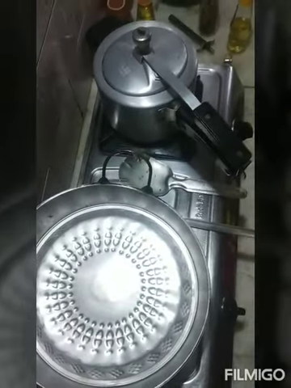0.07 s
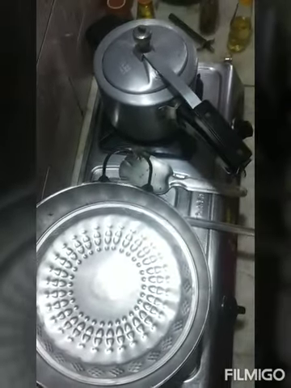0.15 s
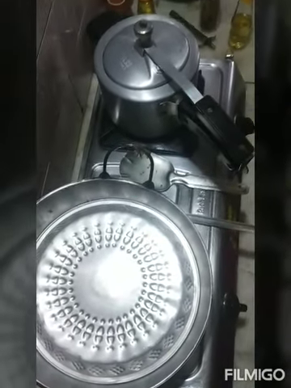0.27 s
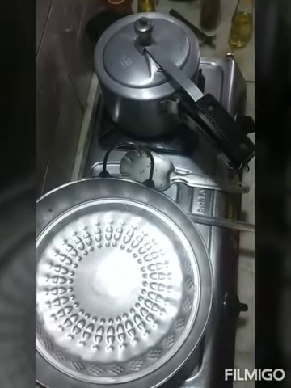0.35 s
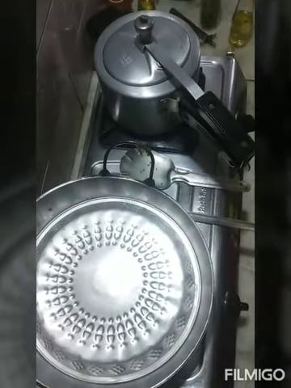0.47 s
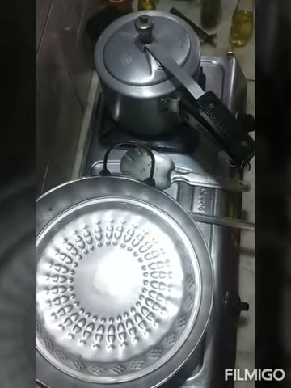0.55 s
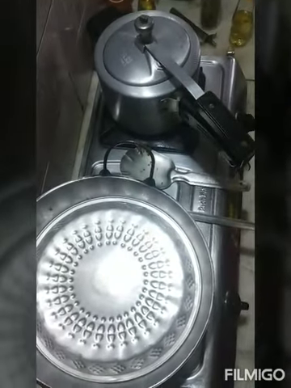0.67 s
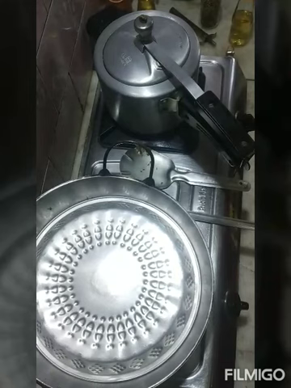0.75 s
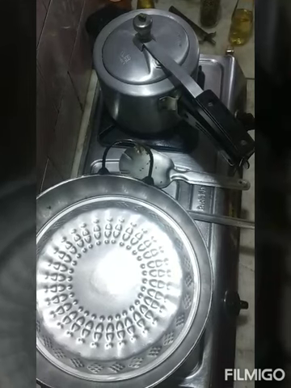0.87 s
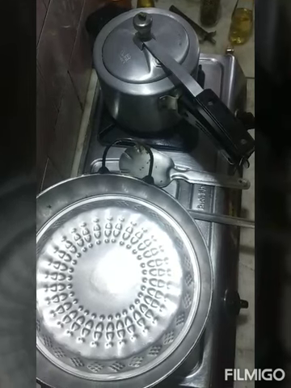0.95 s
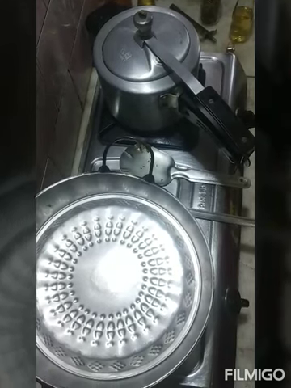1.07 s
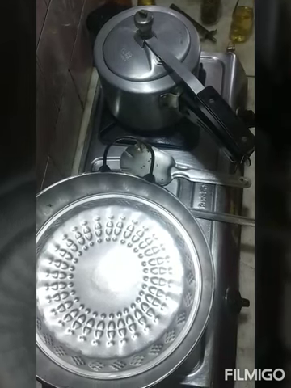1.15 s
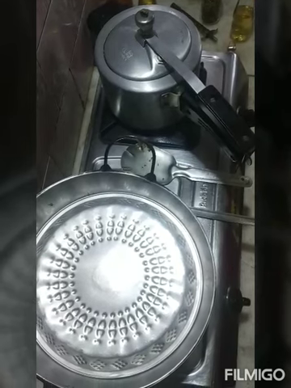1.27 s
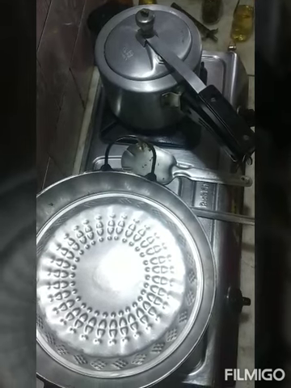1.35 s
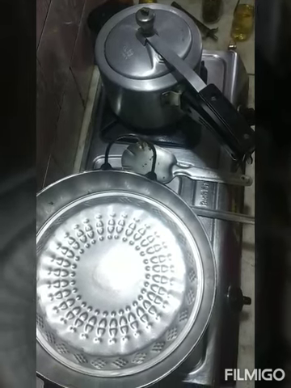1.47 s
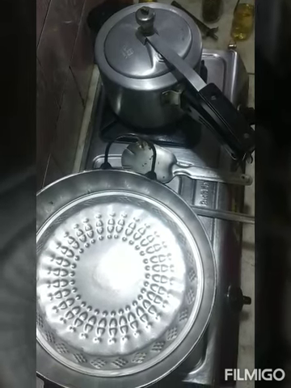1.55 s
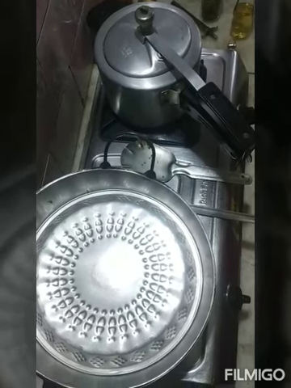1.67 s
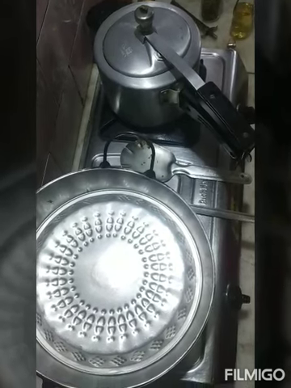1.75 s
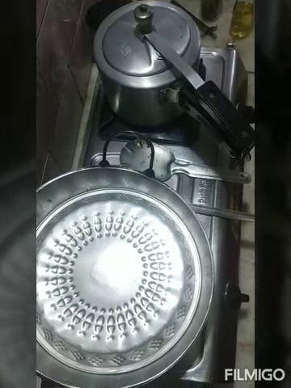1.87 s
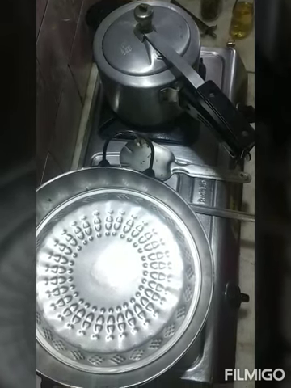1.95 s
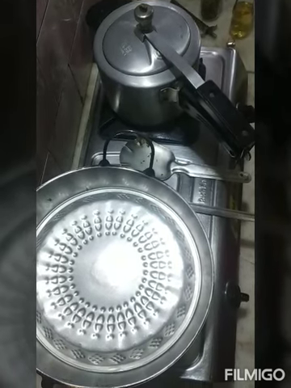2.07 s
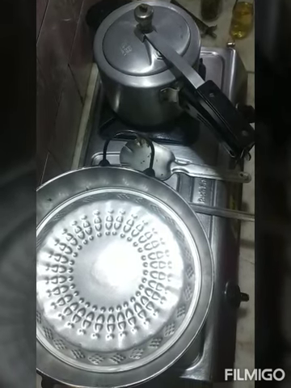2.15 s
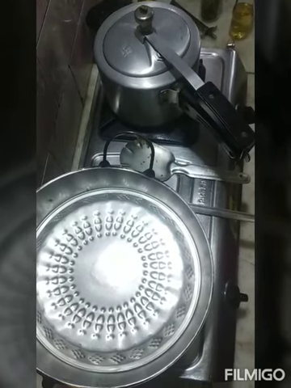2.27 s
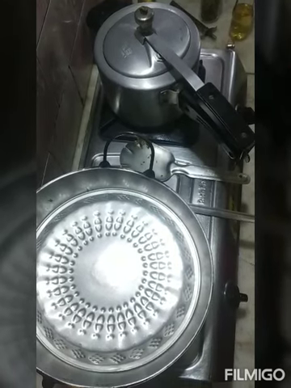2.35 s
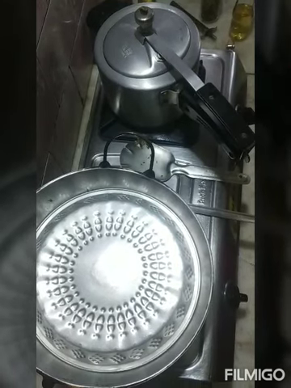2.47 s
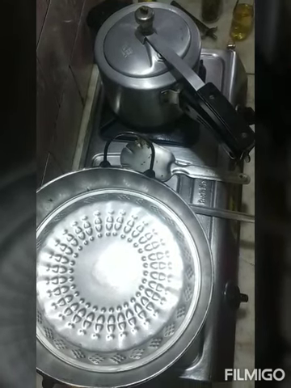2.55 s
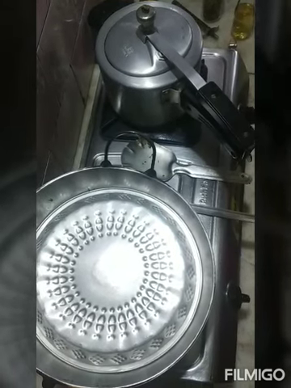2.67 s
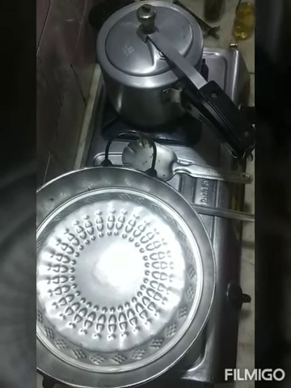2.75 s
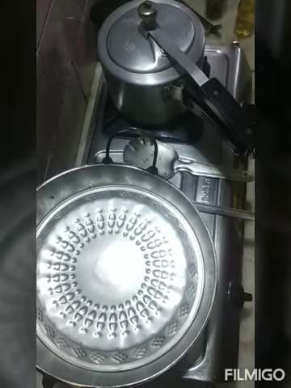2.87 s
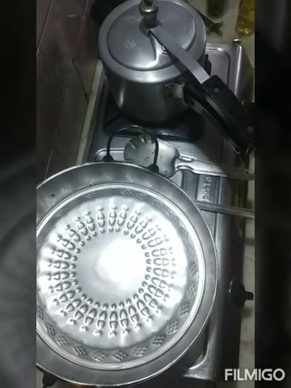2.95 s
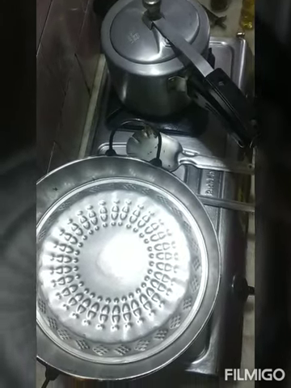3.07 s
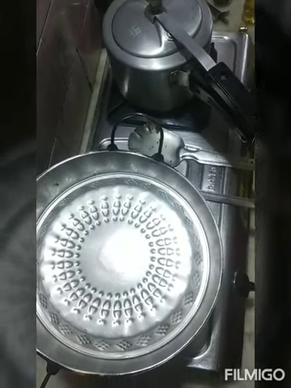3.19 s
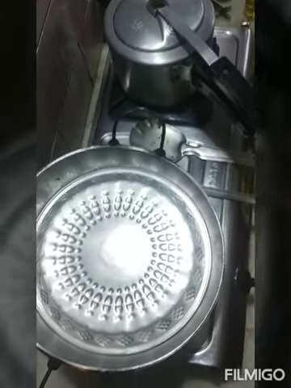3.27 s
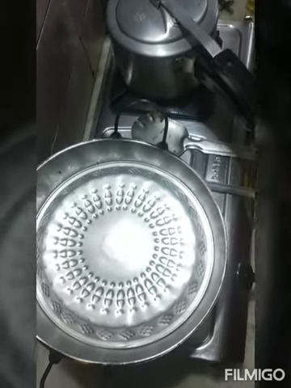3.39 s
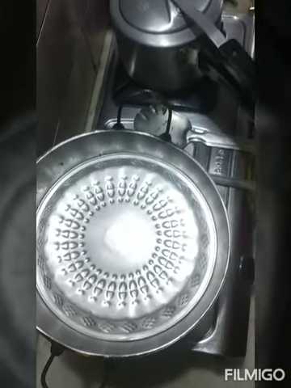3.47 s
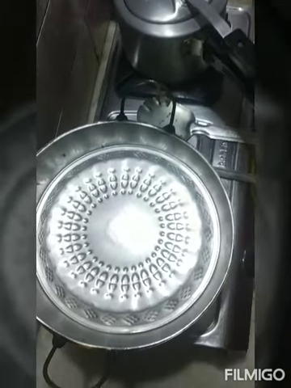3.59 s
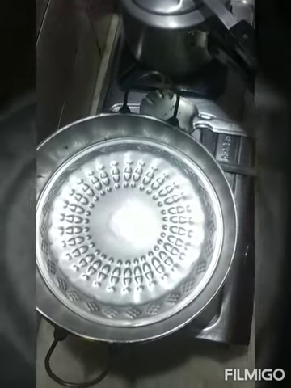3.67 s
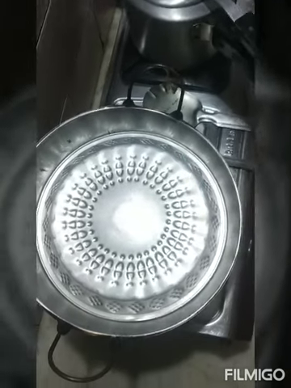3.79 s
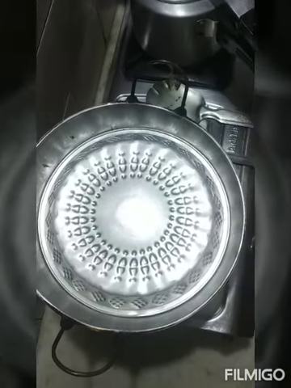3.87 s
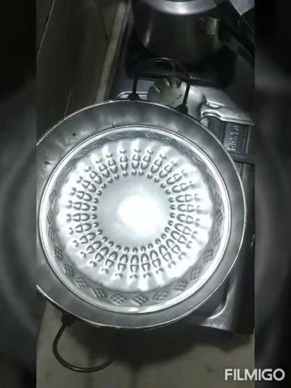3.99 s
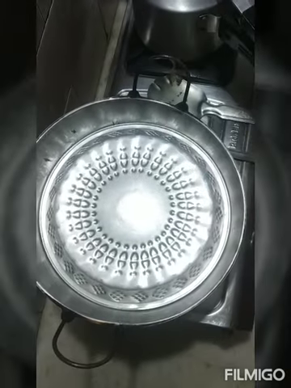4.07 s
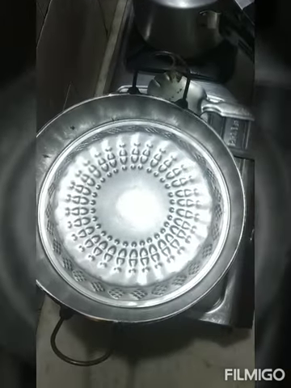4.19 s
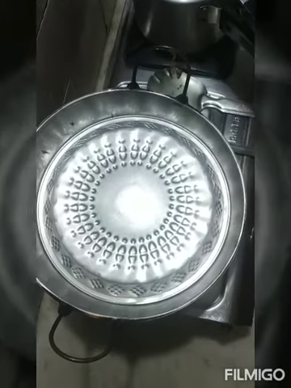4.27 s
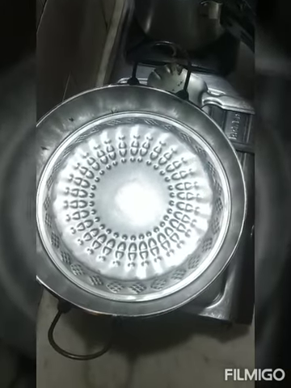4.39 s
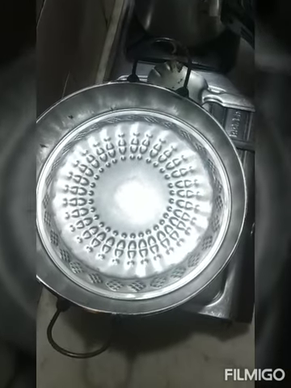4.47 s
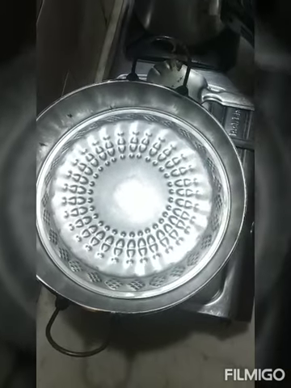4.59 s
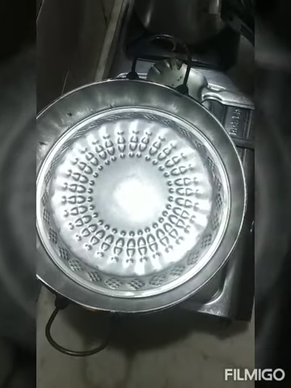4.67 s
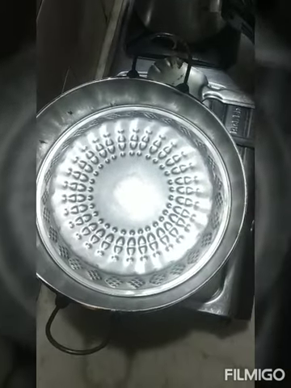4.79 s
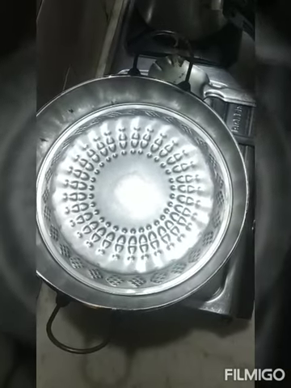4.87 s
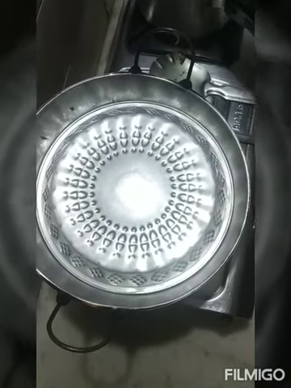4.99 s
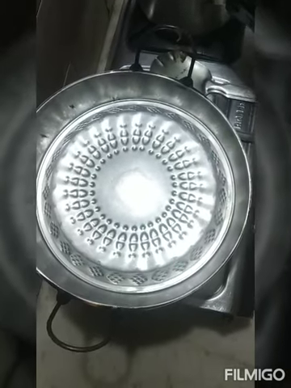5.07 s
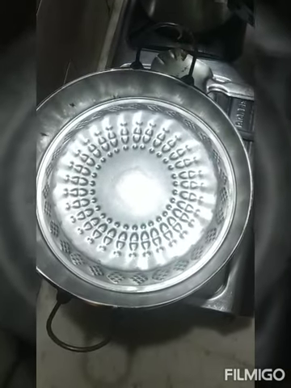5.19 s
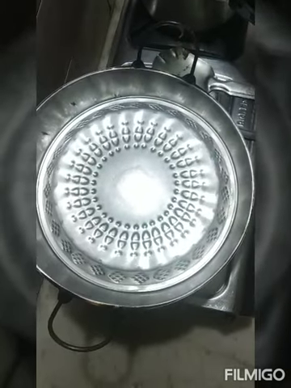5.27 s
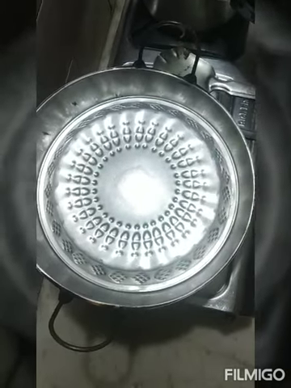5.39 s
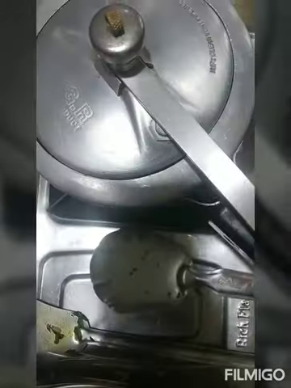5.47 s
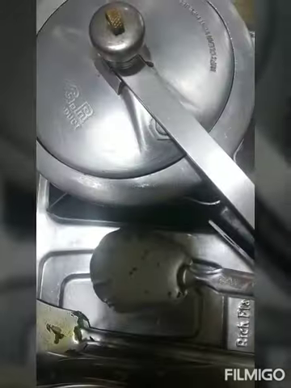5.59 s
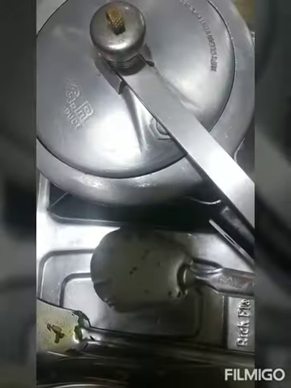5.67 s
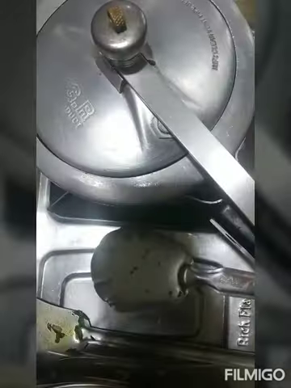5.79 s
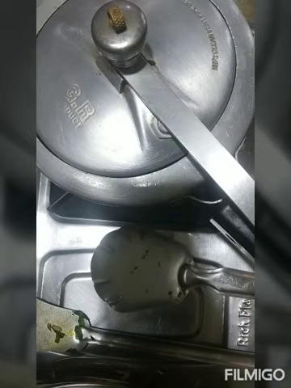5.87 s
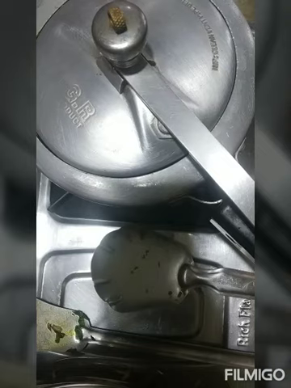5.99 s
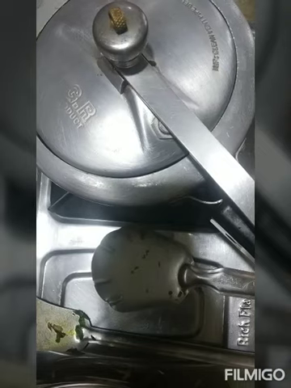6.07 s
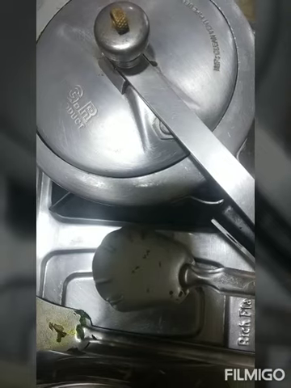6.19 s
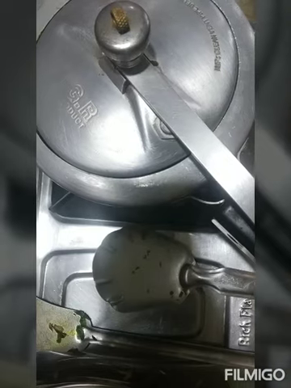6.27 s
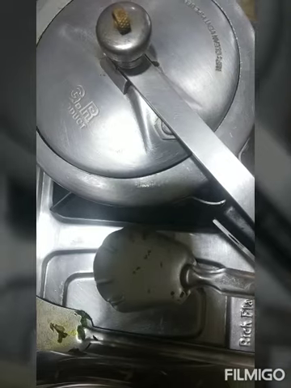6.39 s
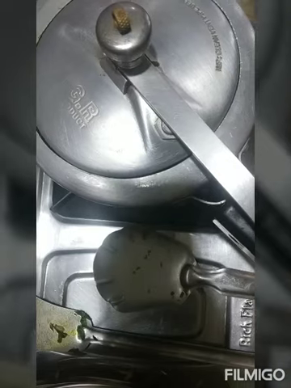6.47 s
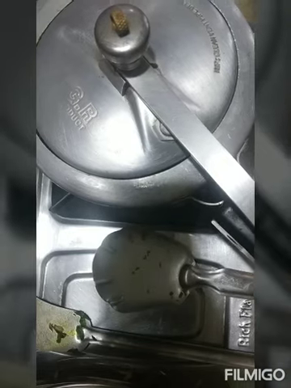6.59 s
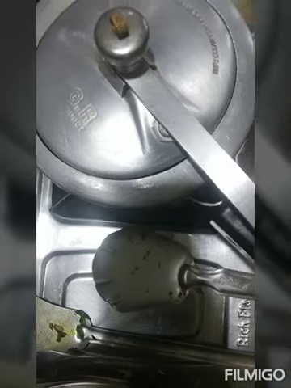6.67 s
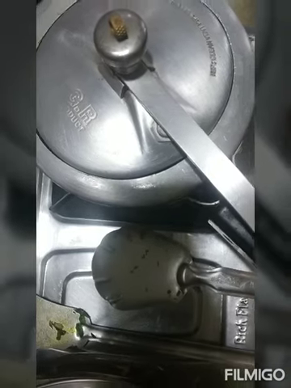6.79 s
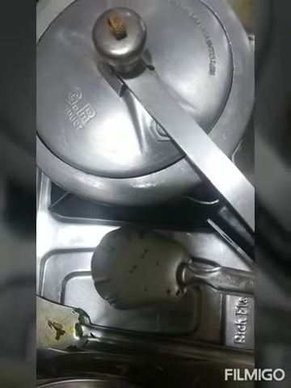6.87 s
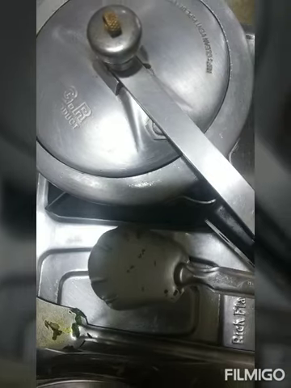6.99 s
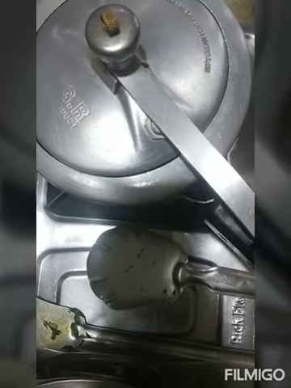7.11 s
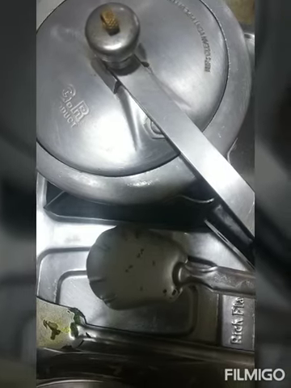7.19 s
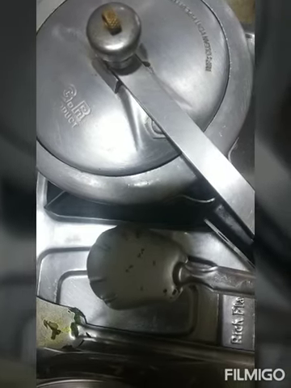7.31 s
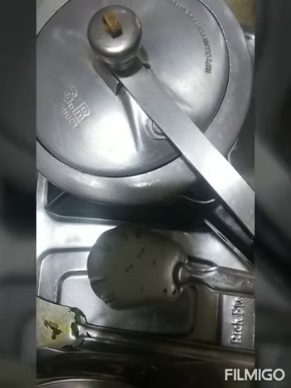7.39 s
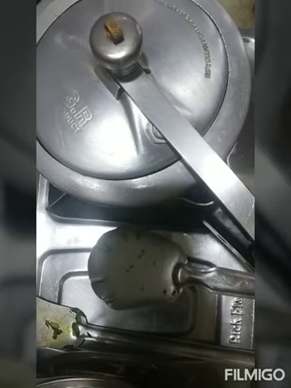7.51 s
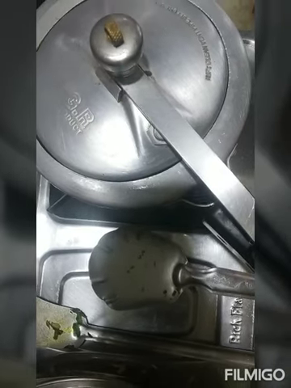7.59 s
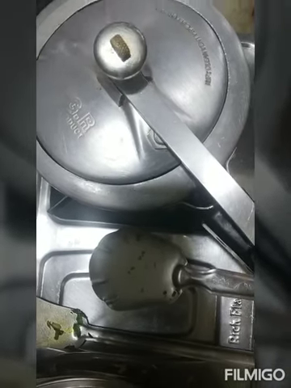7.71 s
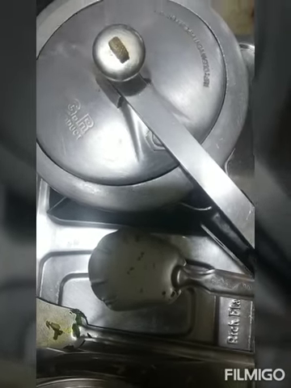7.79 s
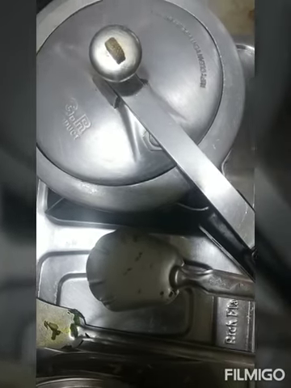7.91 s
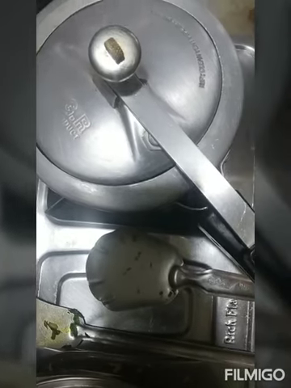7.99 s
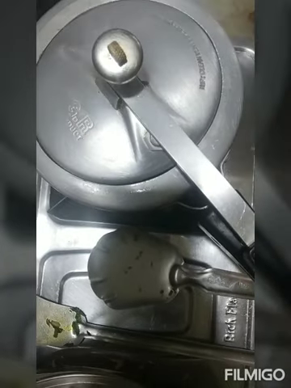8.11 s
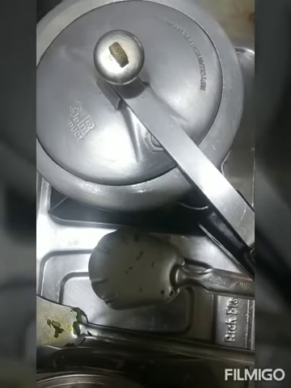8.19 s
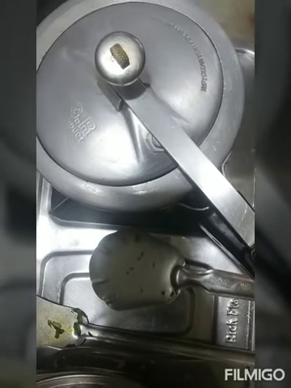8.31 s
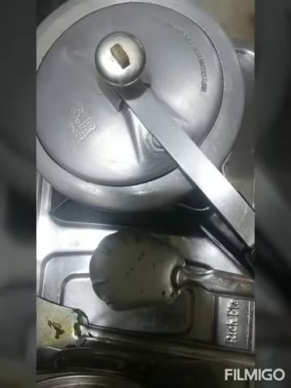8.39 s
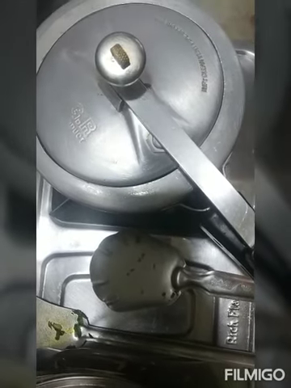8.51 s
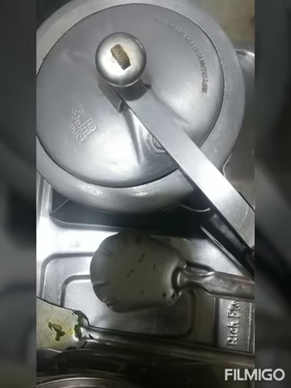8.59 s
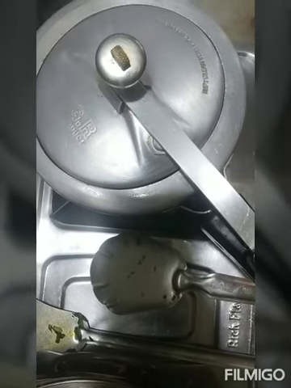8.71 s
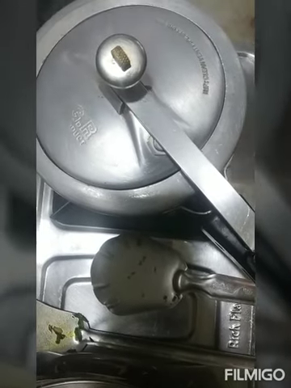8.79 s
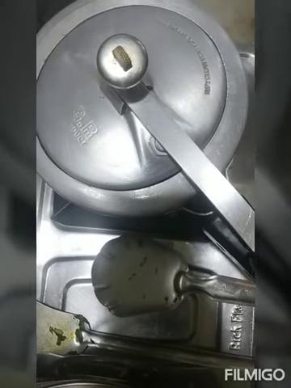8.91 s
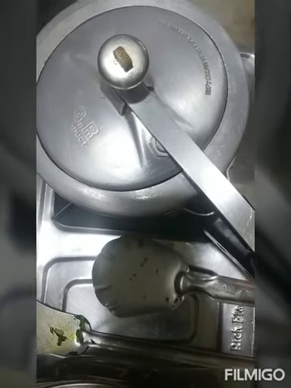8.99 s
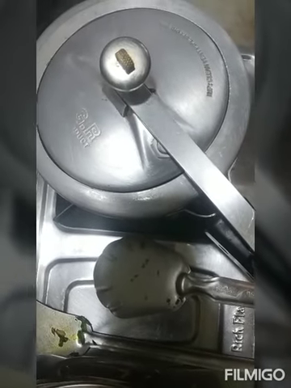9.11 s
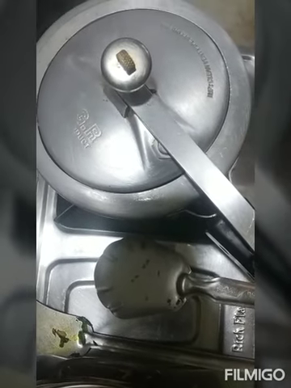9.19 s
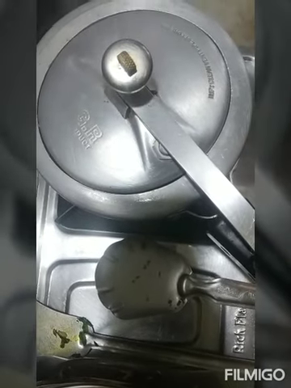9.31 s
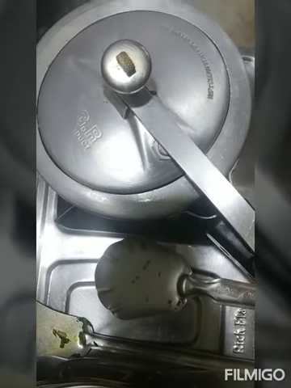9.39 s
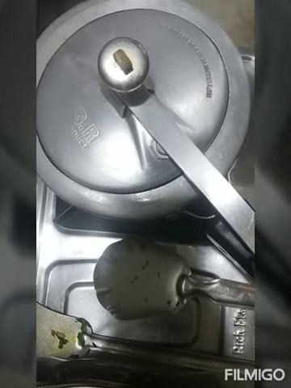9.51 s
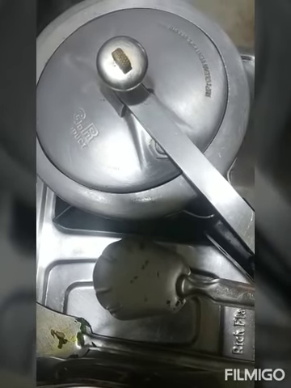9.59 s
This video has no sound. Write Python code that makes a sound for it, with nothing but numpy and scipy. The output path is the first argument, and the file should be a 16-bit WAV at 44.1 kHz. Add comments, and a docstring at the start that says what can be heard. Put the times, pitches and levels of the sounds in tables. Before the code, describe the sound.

From the start, a pressure cooker leaks a thin, high, slightly wavering hiss, with the soft rumble and drone of a gas burner beneath it, in a small hard-walled kitchen. A faint, high metal ping comes at about 1.5 seconds and another near 4.2. The leak spits briefly a few times between 4.5 and 6 seconds. A small tick and soft thud at 5.3 are followed by a steel cup clinking at 5.5 and settling more faintly at 6. At 6.7 seconds the valve weight tips and a much louder jet of steam bursts out, spurting and faltering as it grows. From 7.8 seconds the valve lifts fully, and by about 8.1 the steam is a very loud, harsh, steady blast. Gusts buffet the close stereo microphones with a low rumble, and the sound overloads and distorts until the end, at around 9.5 seconds.

```python
"""A pressure cooker on a gas stove in a hard-walled kitchen. The burner roars softly in its pipe while
steam leaks under the valve weight. Small metal things ring from 1.5 s; a steel cup clinks from 5.5 s.
At 6.7 s the weight tips and lets out a spurting jet. From 7.8 s it lifts fully into a blast that
buffets and overloads the two microphones."""
import sys
import numpy as np
from scipy import signal
from scipy.fft import rfft, irfft, next_fast_len
from scipy.io import wavfile

SR = 44100
rng = np.random.default_rng(int(sys.argv[2]) if len(sys.argv) > 2 else 0)


def unload_wav(signal):
    """Save mono or channel-first audio to the path in sys.argv[1] as 16-bit WAV at rate SR, clipped to [-1, 1]."""
    wavfile.write(
        sys.argv[1],
        SR,
        np.round(np.clip(np.atleast_2d(signal).T, -1, 1) * 32767).astype(np.int16),
    )


N = 425565
N_FFT = next_fast_len(N)
TIME_S = np.arange(N) / SR
HZ = np.maximum(np.fft.rfftfreq(N_FFT, 1 / SR), 1)
LEFT_RIGHT = np.array([[1], [-1]])

# Noise spectra. Each row: frequency in Hz, relative density in dB.
BURNER_SPECTRUM = [(15, 3.5), (30, 10), (50, -6.5), (120, -2.5), (230, -4.5), (450, -5), (700, -12),
                   (1400, -13), (2500, -9), (4000, -24)]
LEAK_SPECTRUM = [(1200, -42), (1900, -24.5), (3500, -17.5), (4050, -22.5), (4750, -18), (5150, -7.5),
                 (6900, -3.5), (8200, -4.5), (9300, -0.5), (10300, -3), (11200, -10), (12200, -12),
                 (14200, -8), (15300, -15)]
LEAK_NEAR_SPECTRUM = [(1200, -34.5), (1900, -17), (3500, -14), (4050, -13.5), (4750, -15.5), (5150, -5.5),
                      (6900, -1.5), (8200, -2), (9600, 2), (10400, 0), (11200, -7.5), (12200, -8.5),
                      (14200, -5), (15300, -11.5)]
JET_SPECTRUM = [(800, -45.5), (1900, -23), (3650, -11.5), (4300, -14.5), (5050, -13), (5350, -2), (7400, 0),
                (8000, -2.5), (8800, 2.5), (11300, -7.5), (12100, -10.5), (12800, 0), (13500, -6),
                (14100, -33)]
BLAST_SPECTRUM = [(880, -48), (1500, -30), (3440, -11.5), (4220, -16.5), (4700, -14), (5440, -10),
                  (5780, -11.5), (6240, -9), (6810, -10.5), (7440, -1), (8780, -2), (10400, 1.5),
                  (13000, -6), (14300, -7.5), (15500, -9.5)]
BUFFET_SPECTRUM = [(12, -32), (20, 3), (65, -2.5), (487, -12), (759, -12.5), (1310, -13.5), (1510, -13.5),
                   (2500, -12), (3250, -17), (5500, -120)]
# Kitchen modes and odd gas pipe modes. Each row: frequency in Hz, width in Hz, peak in dB over the
# rumble. DRONE_LEVELS alone sets the level of the lowest pipe mode.
ROOM_MODES = [(127.7, 14, -3.5), (219.7, 11.5, 7), (602, 14, 4), (2010, 45, -1)]
PIPE_MODES = [(354.5, 73, -2.5), (1070, 177, 7), (1710, 62, 7.5)]
# Lowest pipe mode. Each row: time in seconds, level in dB against the rumble.
DRONE_LEVELS = [(0, -7.5), (3.2, -8.5), (3.6, -3), (4.4, -8), (5.2, -4.5), (6.7, -6.5), (6.95, 2.5),
                (7.02, -7), (7.1, 4), (7.22, -2), (7.4, -9), (7.48, -3), (7.56, -6), (7.62, 4), (7.72, -3)]
# Burner stereo image. Each row: frequency in Hz, left-right correlation.
BURNER_CORRELATION = [(60, 0.31), (150, 0.88), (380, 0.71), (950, 0.26), (2380, 0.053), (5980, 0.0),
                      (15000, -0.0)]
# Colour between the microphones. Each row: frequency in Hz, left minus right in dB.
LEAK_BALANCE = [(1500, 14), (3000, -1.5), (6000, -3.5), (9000, -3), (15000, 0)]
JET_BALANCE = [(60, 1.5), (130, 2.5), (290, 1.0), (640, 12), (1410, 17), (3100, 1.5), (6820, -4.5),
               (15000, 3)]
BLAST_BALANCE = [(60, -8), (130, -6.5), (290, -3.5), (640, -3.5), (1410, -3), (3100, 0), (6820, -3.5),
                 (15000, 3.5)]
# Valve-to-microphone paths over lid and wall. Each row: delay in ms, relative gain.
PATHS_LEFT = [(.45, 0.42), (1.0, 0.12), (2.8, 0.64), (3.7, 0.94)]
PATHS_RIGHT = [(0, 1), (.2, 0.08), (1.3, .3)]
# Narrow wavering tones in the hiss. Each row: frequency in Hz, width in Hz, level in dB against the hiss.
LEAK_TONES = [(2904, 67, -32.5), (3334, 88, -29), (3575, 78, -28), (3812, 55, -29), (4250, 57, -27),
              (4530, 67, -26.5), (4870, 53, -26), (5040, 66, -23.5), (5220, 69, -24), (5400, 65, -22.5),
              (6110, 79, -22.5), (6910, 110, -23)]
JET_TONES = [(2610, 78, -29.5), (3254, 70, -25), (3580, 110, -26.5), (3910, 73, -27.5), (4540, 50, -25),
             (4890, 70, -24), (5360, 130, -17.5), (5670, 120, -18), (6060, 160, -24.5), (7180, 80, -19),
             (7450, 100, -15)]
BLAST_TONES = [(3618, 93, -26), (3910, 110, -26.5), (4256, 64, -26), (4550, 80, -28), (4870, 110, -21),
               (5230, 98, -22.5), (5485, 85, -21), (5670, 71, -23), (5870, 69, -26), (6130, 80, -21.5),
               (6460, 94, -21), (6700, 62, -22.5)]
# The leak spits, the jet falters. Each row: time in seconds, level change in dB.
LEAK_PUFFS = [(1.48, -1), (4.45, 3.5), (5.27, 2), (5.52, 2.5), (6.06, 1.5)]
JET_FALTERS = [(6.772, -1), (6.922, 0), (7.36, -3), (7.5, -3), (7.646, -3.5)]
# Small metal parts and a soft thud. Each row: start in seconds, frequency in Hz, level in dB,
# T60 in seconds.
LONE_RINGS = [(1.458, 12600, -27, .2), (1.47, 12600, -33, 0.22), (4.15, 4540, -36, 0.27),
              (5.24, 2850, -20, 0.032), (5.265, 12430, -29, .15), (5.265, 100, -29, 0.2)]
# Steel cup modes. Each row: frequency in Hz, level in dB against the clink, T60 in seconds.
CUP_MODES = [(900, -6, .08), (3187, 0, .26), (3204, -5, .2), (3150, -8, .12), (3250, -6, .11),
             (7437, -5, .18), (9350, -14, .16), (11560, -13, .09), (13690, -10, .17), (14775, -11, .11)]
# The cup is touched and chatters as it settles. Each row: start in seconds, level in dB.
CUP_CLINKS = [(5.498, -28), (5.507, -36), (5.514, -24.5), (5.562, -31), (6.000, -41), (6.044, -39),
              (6.058, -34)]
# Brief dips below the hiss. Each row: start in seconds, length in seconds, change of the lows in dB,
# change of the drone in dB.
DIPS = [(6.865, 0.028, -7, 6), (6.955, 0.02, -2, 1), (7.089, 0.02, -8, -2), (7.17, 0.023, -10, -3),
        (7.235, 0.056, -19, -35), (7.59, .012, -12, 0.1), (7.721, .052, -26, -2), (7.768, 0.052, -12, -18),
        (7.819, 0.036, -12, 5), (7.863, 0.011, -20, -13.5)]

TIP_S, LIFT_S, OPEN_S = 6.721, 7.77, 8.14   # weight tips, starts to lift, valve fully open


def amp(db):
    """Gain of a level in dB."""
    return 10 ** (np.asarray(db) / 20)


def unit_rms(x):
    """Scale to rms 1."""
    return x / np.sqrt(np.mean(x ** 2))


def over_hz(points):
    """Table value at every FFT bin."""
    hz, value = np.transpose(points)
    return np.interp(np.log(HZ), np.log(hz), value)


def peaks(modes):
    """Sum of resonance curves."""
    return sum(amp(db) / (1 + (2 * (HZ - hz) / width_hz) ** 2) for hz, width_hz, db in modes)


def ramp(start_s, end_s):
    """Quarter-sine rise from 0 to 1."""
    return np.sin(np.pi / 2 * np.clip((TIME_S - start_s) / (end_s - start_s), 0, 1))


def bumps_db(events, lead_s, tail_s):
    """Triangular level change round each event."""
    return sum(np.interp(TIME_S, [s - lead_s, s, s + tail_s], [0, db, 0]) for s, db in events)


def white_spectra(count):
    """Spectra of independent white noises."""
    return rfft(rng.standard_normal((count, N_FFT)))


def drift(rate_hz, control_hz=200):
    """Slow random wander, rms 1."""
    noise = rng.standard_normal(int(N / SR * control_hz + 400))
    pole = np.exp(-2 * np.pi * rate_hz / control_hz)
    slow = signal.lfilter([1], [1, -2 * pole, pole * pole], noise)[398:]
    return np.interp(TIME_S * control_hz, np.arange(len(slow)), unit_rms(slow))


def turbulence(spectra, common_db, band_db, rate_hz):
    """Half-octave bands swell partly in step, partly each on its own; rms 1."""
    half_octaves = 2 * np.log2(HZ / 20)
    common, out = drift(rate_hz / 3), 0
    for k in range(int(half_octaves[-1]) + 2):
        band = spectra * np.clip(1 - abs(half_octaves - k), 0, 1)
        if np.max(abs(band)) > .003 * np.max(abs(spectra)):
            out = out + amp(common_db * common + band_db * drift(rate_hz)) * irfft(band)[:, :N]
    return unit_rms(out)


def burner(start_db=-46, rise_db_per_s=0.2346):
    """Flame noise rumbles in room and pipe modes; the lowest pipe mode drones in gusts."""
    correlation = np.clip(over_hz(BURNER_CORRELATION), 0, 1)
    spectra = []
    for resonance in (1 + peaks(ROOM_MODES + PIPE_MODES[1:]), peaks(PIPE_MODES[:1])):
        mid, side = white_spectra(2)
        pair = np.sqrt(1 + correlation) * mid + np.sqrt(1 - correlation) * side * LEFT_RIGHT
        spectra.append(pair * resonance * amp(over_hz(BURNER_SPECTRUM)))
    rumble = turbulence(spectra[0], common_db=0.25, band_db=2.5, rate_hz=8.5)
    drone = turbulence(spectra[1], common_db=2.9, band_db=0.77, rate_hz=19)
    level_db = start_db + rise_db_per_s * TIME_S
    drone_db = np.interp(TIME_S, *np.transpose(DRONE_LEVELS))
    return amp(level_db) * rumble, amp(level_db + drone_db) * drone


def kitchen_echo(t60_s=0.13):
    """Transfer function of a dense decaying echo tail; mean power 1."""
    t = np.arange(SR // 2) / SR
    tail = rng.standard_normal(len(t)) * amp(-60 * t / t60_s)
    return rfft(tail / np.sqrt(np.sum(tail ** 2)), N_FFT)


def steam(spectrum, balance, direct_share=0.12, echo_share=0.52, **flicker):
    """Turbulent hiss, its power split between near paths, room echoes and a diffuse field."""
    source, left, right = white_spectra(3)
    sides = []
    for paths, diffuse in ((PATHS_LEFT, left), (PATHS_RIGHT, right)):
        comb = sum(gain * np.exp(-2j * np.pi * HZ * ms / 1000) for ms, gain in paths)
        comb /= np.sqrt(np.mean(abs(comb) ** 2))
        transfer = np.sqrt(direct_share) * comb + np.sqrt(echo_share) * kitchen_echo()
        sides.append(source * transfer + np.sqrt(1 - direct_share - echo_share) * diffuse)
    colour_db = over_hz(spectrum) + over_hz(balance) / 2 * LEFT_RIGHT
    return turbulence(np.array(sides) * amp(colour_db), **flicker)


def wavering_tones(tones, waver_db, rate_hz):
    """Narrow wavering tones in the hiss, each swelling and fading on its own."""
    noise, out = rng.standard_normal((2, N)), 0
    for hz, width_hz, db in tones:
        radius = np.exp(-np.pi * width_hz / SR)
        resonator = [1, 0, -1, 1, -2 * radius * np.cos(2 * np.pi * hz / SR), radius ** 2]
        waver = amp(waver_db * np.tanh(drift(rate_hz)))
        out = out + amp(db) * unit_rms(waver * signal.sosfilt([resonator, resonator], noise))
    return out


def leak(start_db=-27.5, sag_db_per_s=0.17, swing_s=(3.3, 4.26)):
    """Thin hiss from under the weight; its colour changes as the microphones swing round."""
    level_db = start_db - sag_db_per_s * TIME_S + bumps_db(LEAK_PUFFS, lead_s=.035, tail_s=.042)
    pan_db = 1.3 - 0.1 * TIME_S   # drifts to the right
    first = steam(LEAK_SPECTRUM, LEAK_BALANCE, common_db=0.33, band_db=0.85, rate_hz=15)
    near = steam(LEAK_NEAR_SPECTRUM, LEAK_BALANCE, common_db=0.35, band_db=0.86, rate_hz=9)
    fade_rad = np.interp(TIME_S, swing_s, [0, np.pi / 2])
    hiss = np.cos(fade_rad) * first + np.sin(fade_rad) * near
    tones = wavering_tones(LEAK_TONES, waver_db=9.5, rate_hz=7.4)
    return amp(level_db + pan_db / 2 * LEFT_RIGHT) * (hiss + tones)


def metal_rings(rise_cycles=24, max_rise_s=0.014, knock_db=-10, knock_t60_s=.05, echo_db=-5):
    """Struck metal rings in decaying sines; each cup contact adds a knock, the room adds echoes."""
    cup_rings = [(s, hz, db + mode_db, t60_s) for s, db in CUP_CLINKS for hz, mode_db, t60_s in CUP_MODES]
    direct = np.zeros(N)
    for start_s, hz, db, t60_s in cup_rings + LONE_RINGS:
        t = np.arange(int(t60_s * SR)) / SR
        swell = 1 - np.exp(-t / min(rise_cycles / hz, max_rise_s))
        decay = amp(db - 60 * t / t60_s)
        direct[round(start_s * SR):][:len(t)] += decay * swell * np.sin(2 * np.pi * hz * t)
    t = np.arange(SR // 10) / SR
    lowpass = signal.butter(1, 2500, fs=SR)
    for start_s, db in CUP_CLINKS:
        knock = unit_rms(signal.lfilter(*lowpass, rng.standard_normal(len(t))))
        direct[round(start_s * SR):][:len(t)] += amp(db + knock_db - 60 * t / knock_t60_s) * knock
    room = 1 + amp(echo_db) * np.array([kitchen_echo(), kitchen_echo()])
    return irfft(rfft(direct, N_FFT) * room)[:, :N]


def jet(start_db=-15.5, attack_s=0.0013, growth_db_per_s=2.2, fade_db_per_s=25):
    """Steam bursts past the tipped weight, grows with pressure, falters as it rocks, fades as it lifts."""
    level_db = start_db + growth_db_per_s * (TIME_S - TIP_S)
    level_db += bumps_db(JET_FALTERS, lead_s=0.062, tail_s=0.047)
    level_db -= fade_db_per_s * np.maximum(TIME_S - LIFT_S, 0)
    hiss = steam(JET_SPECTRUM, JET_BALANCE, common_db=0.52, band_db=0.8, rate_hz=36)
    tones = wavering_tones(JET_TONES, waver_db=9, rate_hz=11.3)
    return amp(level_db) * ramp(TIP_S, TIP_S + attack_s) * (hiss + tones)


def mix_with_dips(noise, drone, edge_s=0.011, below_hz=1970):
    """The lows of the noise dip briefly; the drone drops or swells at the same moments."""
    change_db = np.zeros((2, N))
    for start_s, length_s, *db in DIPS:
        window = np.interp(TIME_S - start_s, [0, edge_s, length_s, length_s + edge_s], [0, 1, 1, 0])
        change_db += np.outer(db, window)
    lows_gain, drone_gain = amp(change_db)
    lows = irfft(rfft(noise, N_FFT) / (1 + (HZ / below_hz) ** 16))[:, :N]
    return noise + (lows_gain - 1) * lows + drone_gain * drone


def blast(level_db=-5):
    """The full flow grows as the valve opens."""
    hiss = steam(BLAST_SPECTRUM, BLAST_BALANCE, echo_share=0.31, common_db=0.49, band_db=0.93, rate_hz=13)
    tones = wavering_tones(BLAST_TONES, waver_db=9, rate_hz=9)
    return amp(level_db) * ramp(LIFT_S, OPEN_S) * (hiss + tones)


def buffet(level_db=-21.5, start_s=7.885, full_s=7.99):
    """Gusts of steam-driven air, unrelated at the two microphones."""
    colour_db = over_hz(BUFFET_SPECTRUM) + over_hz(BLAST_BALANCE) / 2 * LEFT_RIGHT
    gusts = turbulence(white_spectra(2) * amp(colour_db), common_db=0.58, band_db=2.9, rate_hz=21)
    return amp(level_db) * ramp(start_s, full_s) * gusts


def scene():
    """Three stages of steam over burner, rings and gusts; stereo."""
    rumble, drone = burner()
    return mix_with_dips(jet() + blast() + leak() + rumble, drone) + buffet() + metal_rings()


def record(dry):
    """Overload clips the blast hard; a steep low-pass cuts the top."""
    clip_level, cutoff_hz = 0.89, 15680
    lowpass = signal.ellip(12, .1, 70, cutoff_hz, fs=SR, output="sos")
    return signal.sosfilt(lowpass, np.clip(dry, -clip_level, clip_level))


dry = scene()
out = record(dry)
unload_wav(out)
```